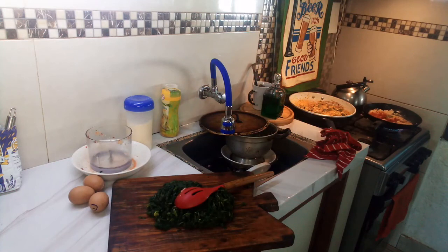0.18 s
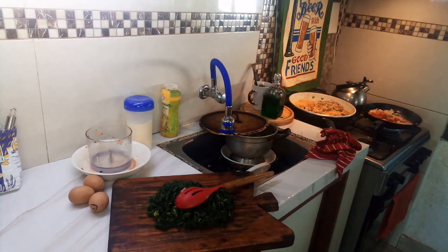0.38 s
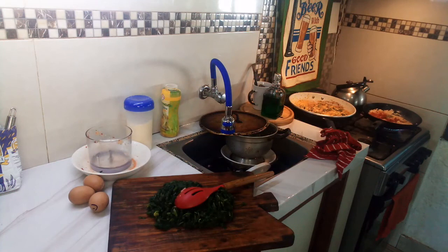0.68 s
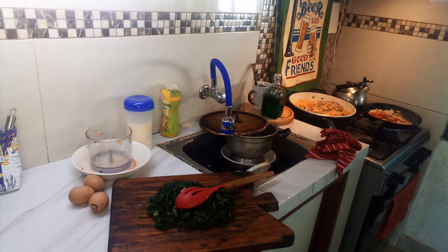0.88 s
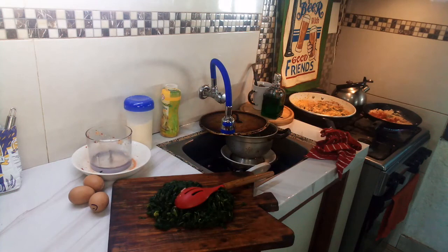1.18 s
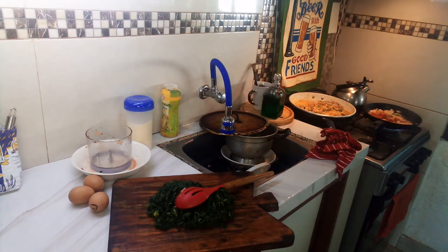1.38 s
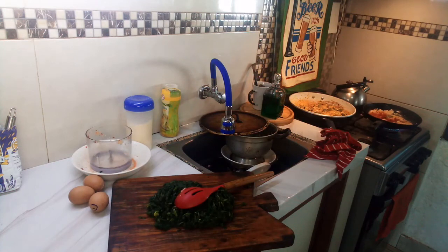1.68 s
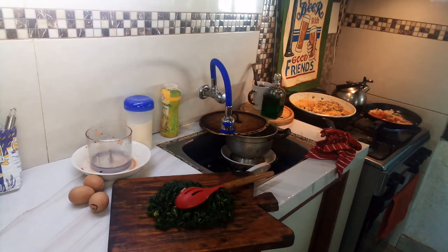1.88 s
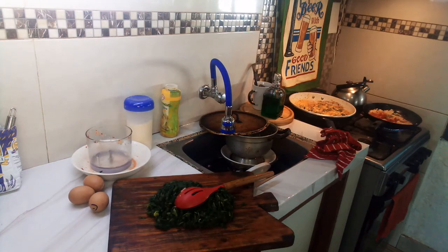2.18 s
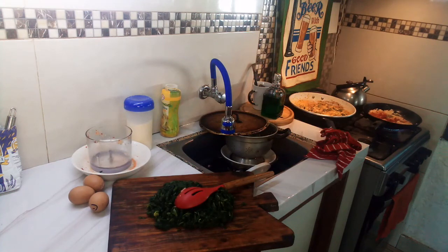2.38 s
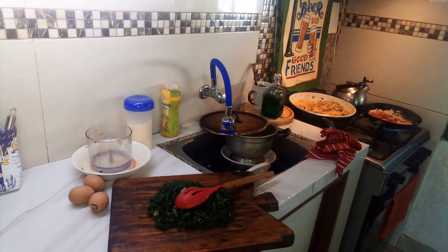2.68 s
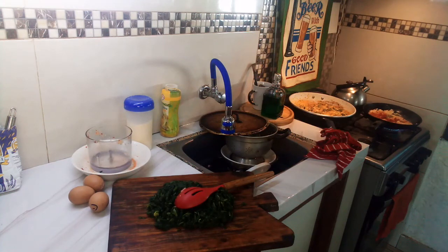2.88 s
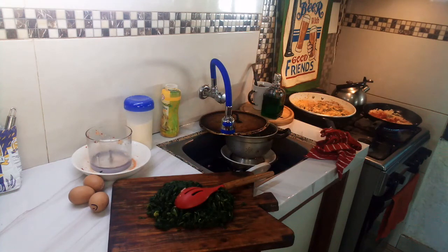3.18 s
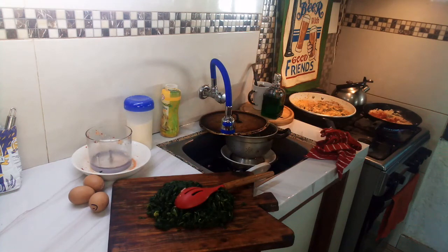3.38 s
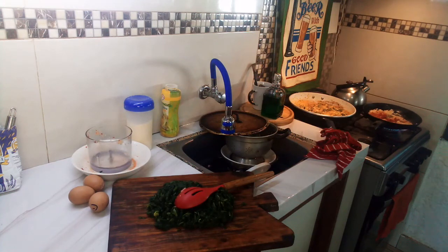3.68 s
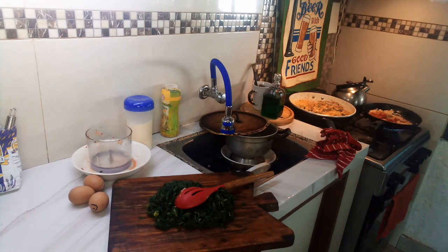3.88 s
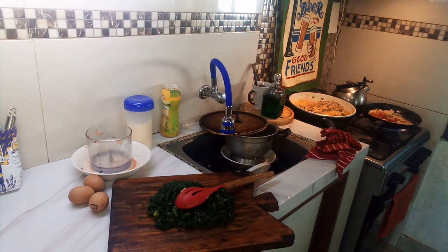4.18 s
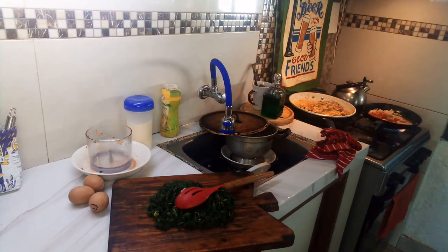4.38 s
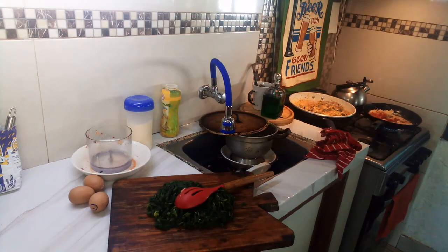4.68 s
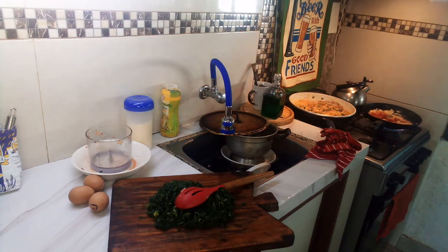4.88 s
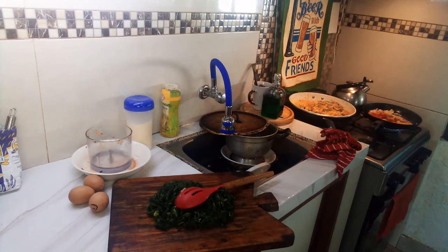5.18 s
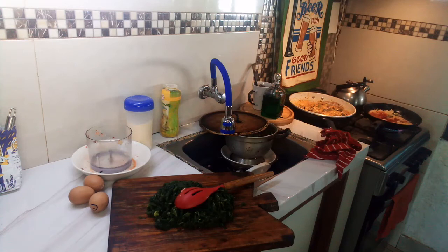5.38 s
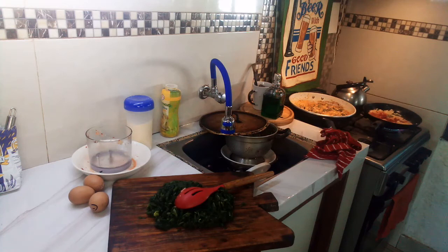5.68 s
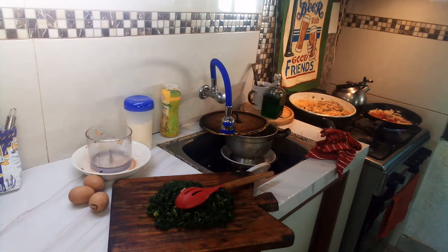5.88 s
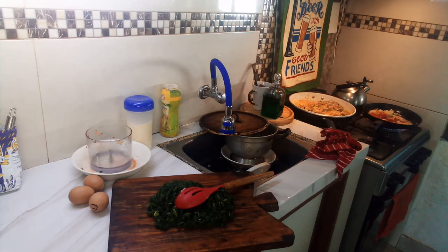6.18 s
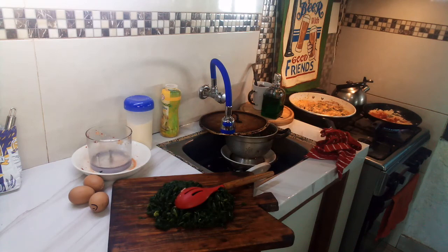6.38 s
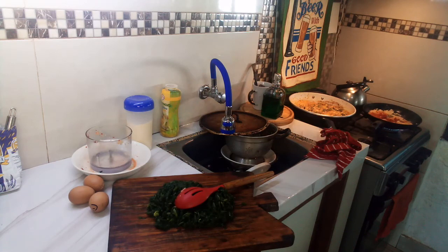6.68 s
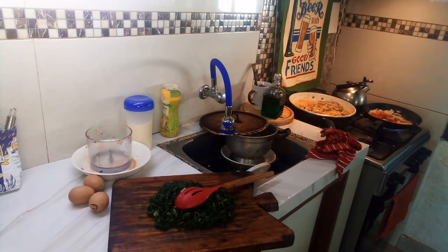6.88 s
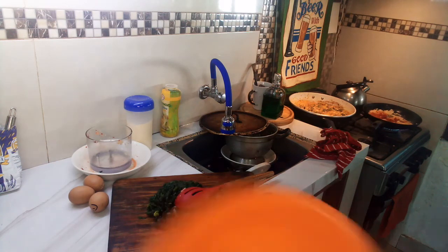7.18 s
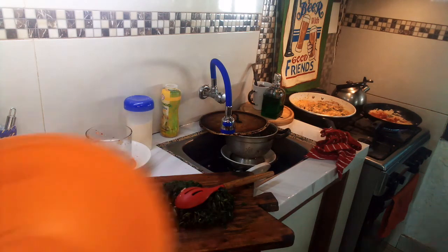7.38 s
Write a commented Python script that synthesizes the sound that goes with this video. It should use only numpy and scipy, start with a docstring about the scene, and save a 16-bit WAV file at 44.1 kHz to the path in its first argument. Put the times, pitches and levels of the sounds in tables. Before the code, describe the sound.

Over soft uneven room hiss and a barely audible hum, faint wooden taps lead to a drawer rubbing and stuttering out, knocking at its stop, then going back in. One sharp cupboard bang dominates, bouncing and ringing briefly between tiled walls. A tiny low creaky moan follows, then near quiet with small handling sounds, dull knocks, a second brief drawer movement and a short plastic scrape. Mono, muffled treble, short bright echo.

```python
"""A small tiled kitchen, heard from the worktop: a wooden drawer judders out, hits its stop and slides back.
A cupboard door bangs shut and booms; lighter knocks, a low groan, a second slide and a short scrape follow.
Blows are noise dying between the walls plus ringing modes; slides are stick-slip pulses and rubbing noise.
Soft rustles and ticks fill the gaps, over a flickering hiss and a faint hum."""
import sys
import numpy as np
from scipy import signal
from scipy.fft import rfft, irfft, next_fast_len
from scipy.io import wavfile
from scipy.ndimage import uniform_filter1d, map_coordinates

SR = 44100
rng = np.random.default_rng(int(sys.argv[2]) if len(sys.argv) > 2 else 0)


def output_pcm(signal):
    """Save a mono or channel-first signal as 16-bit PCM at the path in sys.argv[1].

    Samples are clipped to [-1, 1] before scaling.
    """
    pcm = np.clip(np.atleast_2d(signal).T, -1, 1) * 32767
    wavfile.write(sys.argv[1], SR, np.round(pcm).astype(np.int16))


N = 332955
TIME = np.arange(N) / SR  # the whole scene [s]
AGE = np.arange(SR) / SR  # one second since a blow [s]


def amp(db):
    """Decibels to gain."""
    return 10 ** (np.asarray(db) / 20)


def unit(x):
    """Scale to rms 1."""
    return x / np.sqrt(np.mean(x ** 2) + 1e-20)


def along(points, hz):
    """Read (frequency, value) points on a log frequency axis."""
    f, v = np.transpose(points)
    return np.interp(np.log(hz + 1), np.log(f), v)


def add(track, s, sound):
    """Mix a sound in at time s."""
    start = round(s * SR)
    track[start:start + len(sound)] += sound[:N - start]


def filtered(x, response):
    """x times a response of frequency."""
    m = next_fast_len(len(x) + SR // 4)
    hz = np.fft.rfftfreq(m, 1 / SR)
    return irfft(rfft(x, m) * response(hz), m)[:len(x)]


def resonate(x, peaks):
    """x through parallel (frequency, width, level) resonances."""
    def response(f):
        total = 0
        for k, (centre, width, db) in enumerate(peaks):
            band = 1j * f * width / (centre * centre - f * f + 1j * f * width)
            total = total + (-1) ** k * amp(db) * band  # alternate signs between neighbours
        return total
    return filtered(x, response)


def noise(spectrum):
    """Steady coloured noise of rms 1."""
    return unit(filtered(rng.standard_normal(N), lambda hz: amp(along(spectrum, hz))))


def swell(start, rise, hold, fall_db_per_s):
    """Gain that grows to 1, holds, then dies at a steady rate."""
    age = TIME - start
    return np.clip(age / rise, 0, 1) ** 2 * amp(-fall_db_per_s * np.maximum(age - rise - hold, 0))


# how long the tiled room rings, before scaling by length: (frequency [Hz], 60 dB decay time [s])
ROOM = [(100, 0.67), (400, 0.41), (1500, 0.54), (3000, 0.47), (6000, 0.42), (12000, 0.41)]


def dying(x, length):
    """Let each frequency of x die away between the tiled walls; length scales the room's decay times."""
    hz, t, z = signal.stft(x, SR, nperseg=512)
    t60 = max(length, .05) * along(ROOM, hz)[:, None]
    decay = np.exp(-np.log(1000) * t / t60)
    return signal.istft(z * decay, SR, nperseg=512)[1][:len(x)]


def in_room(x, wet_db):
    """x with the kitchen's echo, wet_db above the direct sound, at about the same power."""
    tail = dying(rng.standard_normal(SR), length=0.33)
    echo = signal.fftconvolve(x, tail / np.linalg.norm(tail))[:N]
    return (x + amp(wet_db) * echo) / np.hypot(1, amp(wet_db))


def blow(colour, tilt_db, contact, cut_hz, length, clatter_db=1.5, clatter_rate=220):
    """One blow heard across the room: reflections swell during the contact, arrive in clumps and die."""
    def shape(hz):
        tilt = tilt_db * np.log2(np.clip(hz, 80, 7000) / 700)
        bass_cut = hz ** 2 / (hz ** 2 + cut_hz ** 2)
        return amp(along(colour, hz) + tilt) * bass_cut

    even = irfft(np.exp(2j * np.pi * rng.random(SR // 2 + 1)))  # flat spectrum, random phases
    unevenness = map_coordinates(rng.standard_normal(size=1000), [AGE * clatter_rate], order=1)
    clumps = amp(clatter_db * unevenness)
    near_walls = 1 + .5 * np.exp(-AGE / 0.026)  # the first reflections are the strongest
    onset = 1 - np.exp(-AGE / max(contact, 1e-4))
    return dying(unit(filtered(even * clumps, shape)), length) * near_walls * onset


def ring(modes, attack):
    """Decaying (frequency, level, decay time) sine modes of a struck part."""
    total = 0
    for hz, db, t60 in modes:
        total = total + amp(db - 60 * AGE / t60) * np.sin(2 * np.pi * (hz * AGE + rng.random()))
    return total * (1 - np.exp(-AGE / attack))


# how unsteady the hiss is: (frequency [Hz], spread [dB])
FLICKER = [(100, 2), (400, 4.5), (900, 2.5), (2000, 5.5), (5000, 2)]


def patchy(x):
    """x with small patches of time and frequency a little louder or softer."""
    hz, t, z = signal.stft(x, SR, nperseg=1024)
    field = uniform_filter1d(rng.standard_normal(z.shape), size=4, axis=0)
    field = uniform_filter1d(field, size=7, axis=1)
    gain = amp(along(FLICKER, hz)[:, None] * unit(field))
    return unit(signal.istft(z * gain, SR, nperseg=1024)[1][:N])


# colour of the hiss: (frequency [Hz], relative level [dB per Hz])
HISS = [(25, -18.5), (40, -2.5), (60, -4.5), (100, -12.5), (165, -8), (232, -8), (301, -12.5), (420, -10.5),
        (800, -14), (1100, -8.5), (1410, -3.5), (1830, -10), (2200, -12), (4200, -5.5), (6300, -5),
        (15000, -7.5)]
# hollow resonances in the hiss: (frequency [Hz], width [Hz], relative level [dB])
WHISTLE = [(1443, 120, -1.5), (2052, 33, -3), (2217, 41, -0.5), (2580, 61, 1.5), (3135, 85, -0.5),
           (3408, 44, 0.5), (4810, 90, -7.5), (5910, 180, -1.5)]


def background():
    """Flickering coloured noise, made slightly hollow by resonances, and a faint wavering hum."""
    hiss = amp(-51.5) * patchy(noise(HISS))
    hollow = amp(-62) * unit(resonate(rng.standard_normal(N), WHISTLE))
    hum = unit(resonate(rng.standard_normal(N), [(98.0, 4.8, 0)]))  # a narrow band of noise wavers
    return hiss + hollow + amp(-76.5) * hum


# faint handling rustles: (time [s], half length [s], centre [Hz], width [Hz], level [dB])
RUSTLES = [(0.335, 0.055, 315, 89.5, -65.5), (4.484, 0.088, 1950, 897, -56.5), (4.83, 0.086, 626, 150, -66),
           (5.317, 0.055, 12410, 9100, -40), (5.4, 0.043, 1030, 490, -55), (5.508, 0.06, 463, 129, -61),
           (6.418, 0.12, 990, 680, -55), (6.47, .15, 4500, 4100, -57.5), (6.94, .035, 500, 150, -53),
           (6.942, 0.16, 6850, 7000, -51)]


def rustles():
    """Things are shifted softly: short swells of sparse friction grains through one resonance."""
    out = np.zeros(N)
    for s, half, hz, width, db in RUSTLES:
        grains = rng.standard_normal(N) * (rng.random(N) < .06)
        envelope = np.exp(-((TIME - s) / half) ** 2)
        out += amp(db) * envelope * unit(resonate(grains, [(hz, width, 0)]))
    return in_room(out, wet_db=2.5)


# lighter wooden knocks: (time [s], level before a trim [dB], brightness [dB per octave],
# contact [s], bass cut [Hz], echo length [times the room's])
KNOCKS = [(.516, -45, 1, 0.015, 900, 0.71), (0.644, -50, -6, 0.018, 40, 0.31),
          (1.137, -45, -1.5, .0005, 403, 1.1), (1.156, -47, -8, 0.0095, 40, 0.81),
          (1.434, -37.5, -2.5, 0.005, 200, 0.95), (1.473, -28.5, 2.5, 0.0053, 300, 0.76),
          (1.506, -38.5, 0.5, .002, 700, 1.1), (1.946, -40, -2, 0.0073, 60, 0.59),
          (5.255, -47, -1.5, 0.00044, 396, 1.2), (5.739, -43.5, 0.5, 0.0013, 304, 0.93),
          (6.651, -39, 0, .003, 40.8, 1.17), (6.660, -34, -0.4, 0.0036, 40, 1),
          (7.134, -48.5, 1.5, .002, 78, 0.39)]
# colour of knocked wood: (frequency [Hz], relative level [dB per Hz])
WOOD = [(30, -26), (70, -12), (105, 0), (145, -4), (185, 5), (260, -2), (360, 2), (560, -1), (800, -1.5),
        (1150, -4.5), (1450, -5.5), (2100, -11.5), (3000, -16), (6500, -20.5), (15000, -27)]
# dull bumps that boom in the cupboard's cavity: (time [s], level before the mode levels [dB])
BUMPS = [(0.653, -53.5), (6.661, -40)]
# the cavity's modes: (frequency [Hz], relative level [dB], 60 dB decay time [s])
CAVITY = [(77, -3, .25), (108.3, 4.5, 0.26), (184, -3, 0.27)]
# the drawer's stop rings: (frequency [Hz], level [dB], 60 dB decay time [s])
STOP = [(945, -39.5, 0.26), (1158, -37.5, 0.46), (1177, -29, 0.19), (1470, -40, .3), (1560, -44, 0.35),
        (1557, -49, .45), (2010, -41, 0.23), (2770, -42, .2)]


def knocks():
    """Doors and drawers are pulled, reach their stops and are pushed to: wooden blows, booms and a ring."""
    out = np.zeros(N)
    for s, db, tilt_db, contact, cut_hz, length in KNOCKS:
        add(out, s, amp(db - 3.5) * blow(WOOD, tilt_db, contact, cut_hz, length))
    for s, db in BUMPS:
        add(out, s, amp(db) * ring(CAVITY, attack=0.0082))
    add(out, 1.477, ring(STOP, attack=0.0032))
    return out


# tiny ticks: (time [s], starting level [dB])
TICKS = [(0.837, -35), (7.246, -38.5)]


def ticks():
    """Tiny sharp ticks close by: fast-dying treble noise with little echo."""
    out = np.zeros(N)
    for s, db in TICKS:
        treble = unit(np.diff(rng.standard_normal(SR + 1)))
        add(out, s, amp(db) * treble * np.exp(-AGE / 0.012))
    return in_room(out, wet_db=-19.0)


def stroke(start, length, growth_db_per_s, rise, fall_db_per_s):
    """Gain of one drawer movement, about 1 at its middle: it starts, grows or eases, and coasts to rest."""
    age = np.maximum(TIME - start, 0)
    travel_db = growth_db_per_s * (np.minimum(age, length) - length / 2)
    return (1 - np.exp(-age / rise)) * amp(travel_db - fall_db_per_s * np.maximum(age - length, 0))


# a drawer is pulled or pushed: (time [s], length [s], judder level [dB], rubbing level [dB],
# judder growth [dB per s], rubbing growth [dB per s], drawer)
STROKES = [(1.128, 0.4, -45, -49, 14, -28, "first"), (1.656, 0.34, -46, -54, 9, 11, "first"),
           (6.893, 0.11, -56.5, -49, 143, 9, "second"), (7.114, 0.041, -52, -63.5, 10, -2, "second")]
# a drawer catches hard on its runners: (time [s], peak level before a lift [dB], drawer)
CATCHES = [(1.146, -42.5, "first"), (1.203, -46, "first"), (1.347, -47, "first"), (1.454, -38, "first"),
           (1.754, -42, "first"), (1.922, -35, "first"), (1.935, -38.5, "first"), (1.972, -43, "first"),
           (7.138, -42, "second")]
# the first drawer's box: (frequency [Hz], width [Hz], relative level [dB])
DRAWER = [(237, 23.6, -5), (347.2, 24, -0.5), (407.5, 34, 0.5), (546, 40, -9.5)]
# the second drawer's box: (frequency [Hz], width [Hz], relative level [dB])
DRAWER_2 = [(181, 37, -10.5), (301, 9.6, 4.5), (502, 48, -13.5)]
# colour of the rubbing faces: (frequency [Hz], relative level [dB per Hz])
RUB = [(40, -18), (110, -12), (300, -7.5), (600, -1), (1100, -4.5), (1800, -2.5), (2600, -8.5), (3400, -10),
       (4500, -16.5), (6500, -16), (15000, -22.5)]
JUDDER_RISE_S, RUB_RISE_S = 0.036, 0.0071  # the hand gets the drawer moving
JUDDER_FALL_DB_PER_S, RUB_FALL_DB_PER_S = 142, 114.5  # it coasts to rest
# typical slips a second, unevenness of their gaps (log) and of their sizes
SLIP_RATE, SLIP_SCATTER, SLIP_SPREAD_DB = 110, .45, 4


def drawer(name, box):
    """Wood sticks and slips on the runners: uneven pulses drum on the drawer's box while the faces rub."""
    judder, rubbing = np.zeros((2, N))
    for s, length, judder_db, rubbing_db, judder_growth, rubbing_growth, which in STROKES:
        if which == name:
            judder += amp(judder_db) * stroke(s, length, judder_growth, JUDDER_RISE_S, JUDDER_FALL_DB_PER_S)
            rubbing += amp(rubbing_db) * stroke(s, length, rubbing_growth, RUB_RISE_S, RUB_FALL_DB_PER_S)

    chance = rng.standard_normal((2500, 2))
    at = np.cumsum(np.exp(SLIP_SCATTER * chance[:, 0]) / SLIP_RATE)
    sizes = amp(SLIP_SPREAD_DB * chance[:, 1])
    slips = np.bincount((at * SR).astype(int), sizes, N)[:N]

    drum = unit(resonate(slips, box))
    # the steady pull of the hand evens out the judder
    drum /= np.sqrt(np.abs(uniform_filter1d(drum ** 2, size=1500)) + 0.066)
    drum *= judder
    thud = resonate(signal.unit_impulse(SR // 4), box)
    for s, db, which in CATCHES:
        if which == name:
            add(drum, s, amp(db + 5.5) * thud / np.abs(thud).max())

    # each slip sheds a puff of friction noise
    grip = unit(signal.lfilter([1], [1, -np.exp(-1 / (0.012 * SR))], slips))
    rub = rubbing * unit(noise(RUB) * (1.1 + grip))
    return in_room(drum, wet_db=-6.5) + in_room(rub, wet_db=-9.5)


# the door hits its frame and rebounds: (time [s], level before a trim [dB],
# brightness [dB per octave], contact [s])
SLAM = [(2.703, -31.5, -5.5, .003), (2.710, -16.5, 3, 0.0054), (2.721, -13.5, 0.1, 0.0038),
        (2.732, -27, -3, 0.0041), (2.766, -20.5, -3, .005), (2.856, -25.5, -2.5, 0.00786)]
# colour of the slam: (frequency [Hz], relative level [dB per Hz])
SLAM_COLOUR = [(30, -30), (70, -6.5), (120, -15), (250, -10.5), (340, -5), (480, -1.5), (680, -3.5),
               (800, -4), (1050, -11.5), (1500, -11.8), (2400, -18), (3400, -19), (4700, -27),
               (6200, -25.5), (15000, -33)]
# the cupboard's panels and cavity: (frequency [Hz], relative level [dB], 60 dB decay time [s])
CARCASS = [(108.2, -7, 0.67), (184.7, -27, 0.6), (217.6, 1, 0.5), (273, -8, 0.58), (346.3, -7.5, .48),
           (379, -2, .42), (413.4, 3, 0.45), (449, -7.5, 0.58), (569, -16, 0.62), (738, -8, 0.42),
           (784, -12.5, 0.46), (824, -7, 0.38), (903, -2.5, 0.412), (1119, -8.5, .42), (1308, -14.5, 0.36),
           (1495, -11.5, 0.43), (1540, -13.5, .42), (2030, -21.5, 0.57), (2296, -15, .42),
           (2600, -22, 0.32), (3120, -19.5, 0.33), (3483, -9, 0.19), (4930, -15.5, 0.3), (5550, -12, .3)]


def door():
    """The door hits its frame, rebounds and settles; the main blow sets the whole cupboard ringing."""
    out = np.zeros(N)
    for s, db, tilt_db, contact in SLAM:
        add(out, s, amp(db - 4.0) * blow(SLAM_COLOUR, tilt_db, contact, cut_hz=68, length=0.98))
    # keeps the boom free of rumble below about 70 Hz
    rumble_cut = signal.butter(2, 70, "highpass", fs=SR, output="sos")
    boom = signal.sosfilt(rumble_cut, ring(CARCASS, attack=0.011))
    add(out, 2.721, amp(-18.5) * boom)
    return out


GROAN_S, GROAN_DB = 3.234, -49  # start, level about which it flutters
GROAN_RISE_S, GROAN_HOLD_S, GROAN_FALL_DB_PER_S = 0.043, 0.052, 380
GROAN_START_HZ, GROAN_REST_HZ, GROAN_SINK_S = 339, 194, 0.025
FLUTTER_HZ, FLUTTER_DB = 30, 6  # rate, swing either way


def groan():
    """A soft low sine tone that swells, sinks to a resting pitch and flutters in level."""
    age = np.maximum(TIME - GROAN_S, 0)
    hz = GROAN_REST_HZ + (GROAN_START_HZ - GROAN_REST_HZ) * np.exp(-age / GROAN_SINK_S)
    tone = unit(np.sin(2 * np.pi * np.cumsum(hz) / SR))
    flutter_db = FLUTTER_DB * np.cos(2 * np.pi * FLUTTER_HZ * (age - GROAN_RISE_S))
    envelope = swell(GROAN_S, GROAN_RISE_S, GROAN_HOLD_S, GROAN_FALL_DB_PER_S)
    return in_room(amp(GROAN_DB + flutter_db) * envelope * tone, wet_db=-7)


# a plastic bowl's wall resonances: (frequency [Hz], width [Hz], relative level [dB])
BOWL = [(1010, 660, -14.5), (1950, 190, 1.5), (2240, 92, 2), (2850, 740, -8.5)]
SCRAPE_S, SCRAPE_DB = 7.447, -43.5
SCRAPE_RISE_S, SCRAPE_HOLD_S, SCRAPE_FALL_DB_PER_S = 0.0307, 0.011, 550


def scrape():
    """A plastic bowl scuffs briefly: spiky friction through its wall resonances."""
    grains = rng.standard_normal(N) * (rng.random(N) < .05)
    level = amp(SCRAPE_DB) * swell(SCRAPE_S, SCRAPE_RISE_S, SCRAPE_HOLD_S, SCRAPE_FALL_DB_PER_S)
    return in_room(level * unit(resonate(grains, BOWL)), wet_db=2)


def scene():
    """Everything in the kitchen, in mono."""
    drawers = drawer("first", DRAWER) + drawer("second", DRAWER_2)
    handling = rustles() + knocks() + ticks()
    return (background() + handling + drawers + door() + groan() + scrape())[None]


# the microphone's response: (frequency [Hz], level [dB])
MICROPHONE = [(25, -15), (50, -5.5), (80, -1), (6500, -0.5), (7200, -8.5), (8200, -21), (10000, -26.5),
              (13800, -30.5), (14900, -16), (15800, -17.5)]
TOP_HZ = 15850


def record(dry):
    """A small microphone, dull in the treble, with a steep band limit."""
    return filtered(dry[0], lambda hz: amp(along(MICROPHONE, hz)) * (hz < TOP_HZ))[None]


dry = scene()
out = record(dry)
output_pcm(out)
```